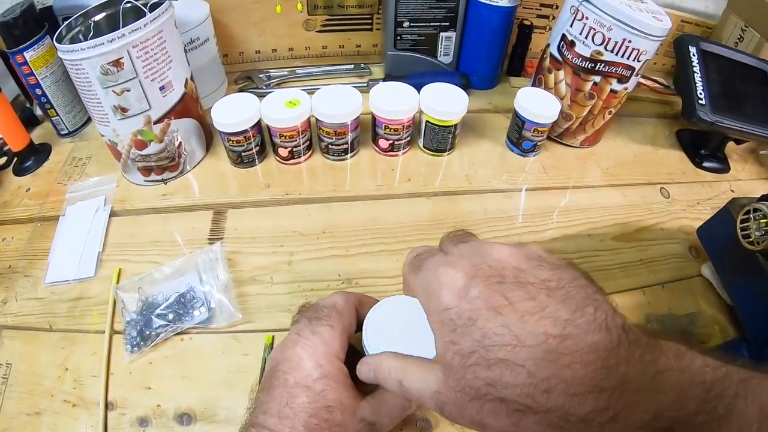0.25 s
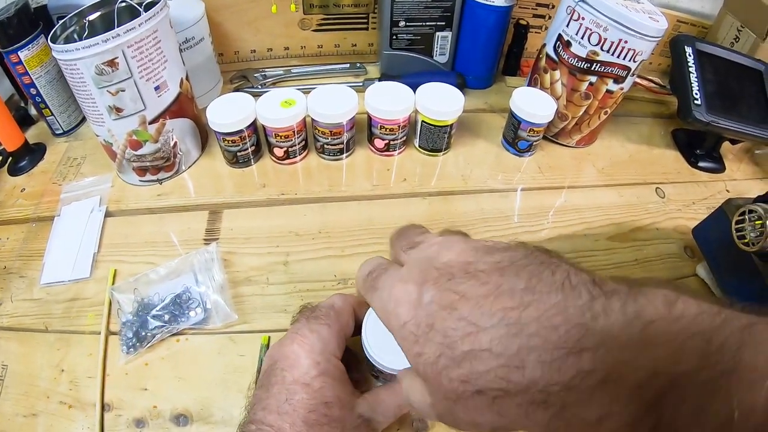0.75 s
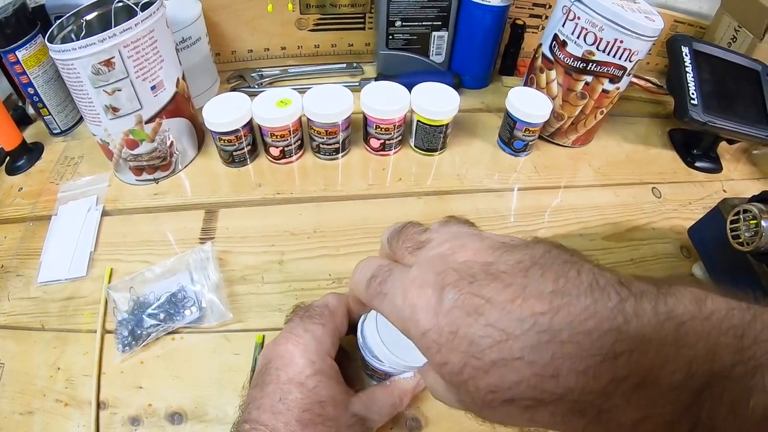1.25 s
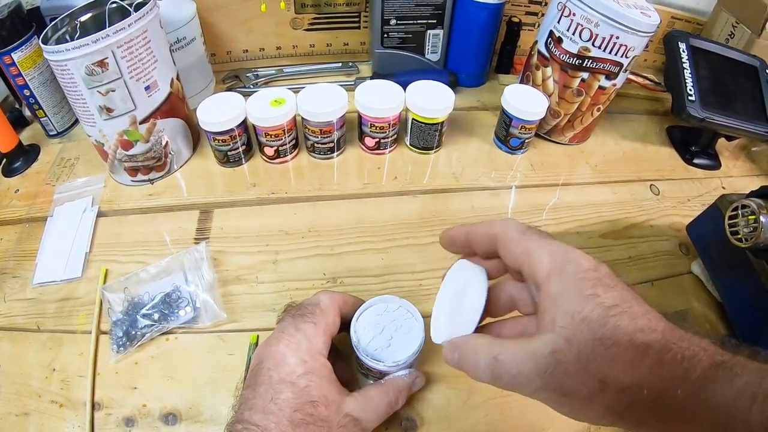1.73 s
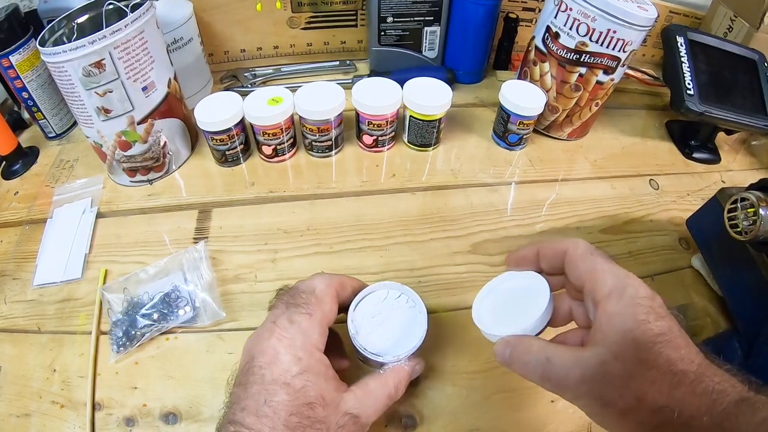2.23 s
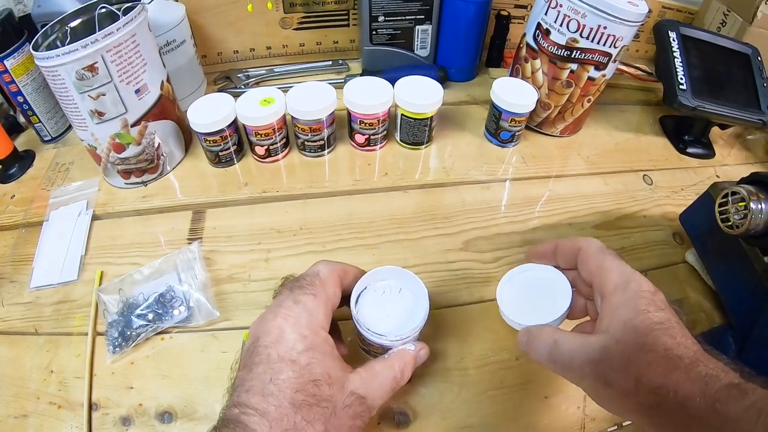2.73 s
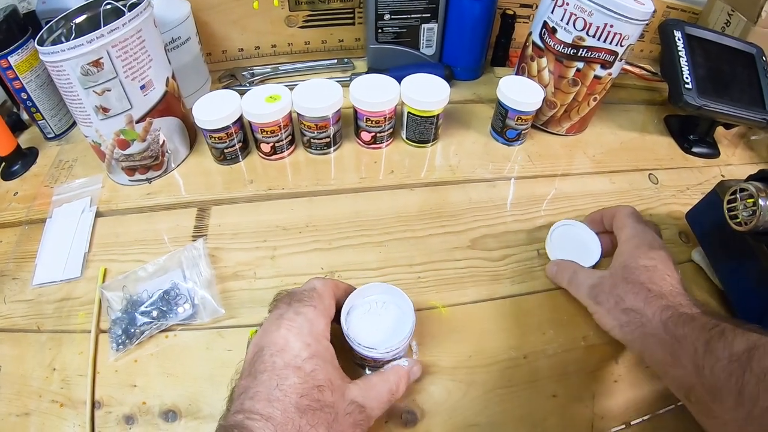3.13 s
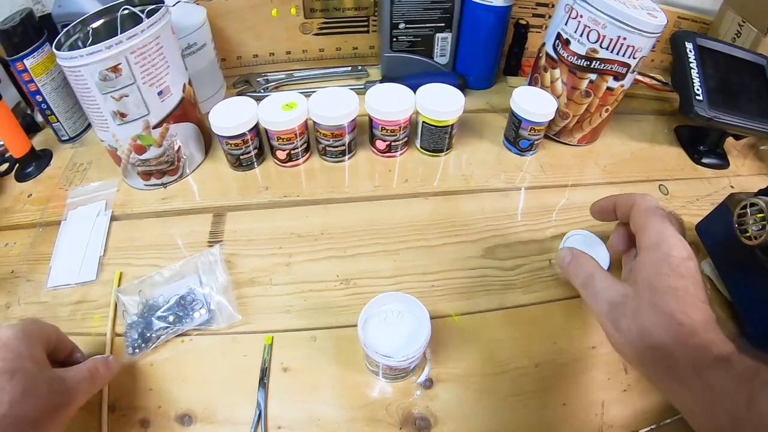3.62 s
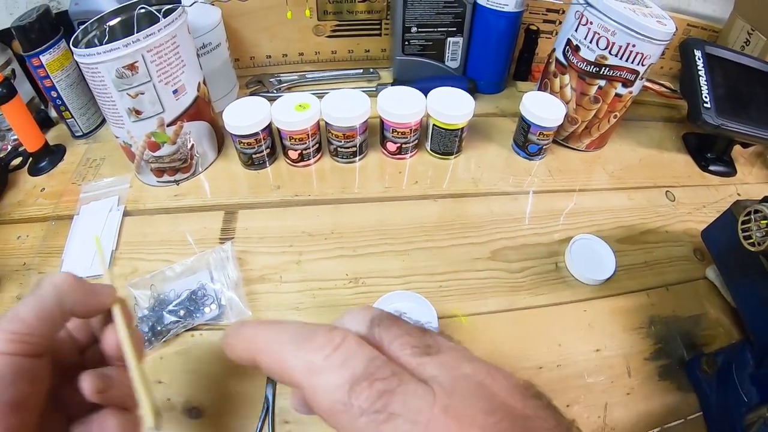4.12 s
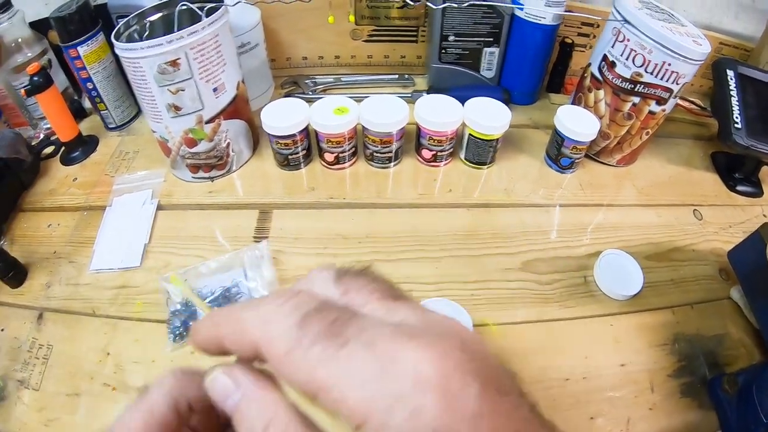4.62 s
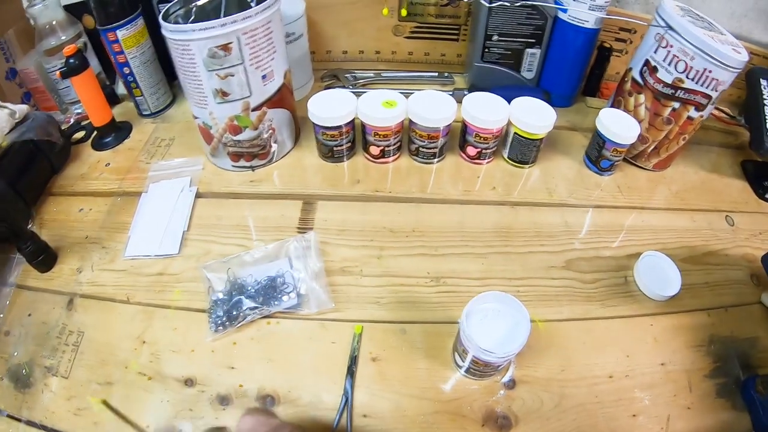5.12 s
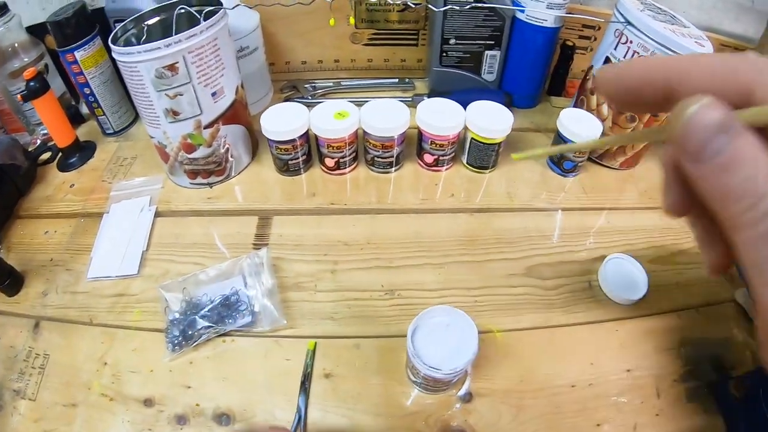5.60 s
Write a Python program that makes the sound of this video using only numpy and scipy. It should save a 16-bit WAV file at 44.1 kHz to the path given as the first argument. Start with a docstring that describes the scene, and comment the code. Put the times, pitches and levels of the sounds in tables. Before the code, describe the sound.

In a small workshop, a small plastic jar is unscrewed in four short grating twists, with bright clicks, a hard knock and tiny squeaks. Quiet handling follows, then lid and jar tap down on a wooden bench with dull thuds. Hands rub dryly before a thin wooden stick snaps twice, much louder than the rest. A body-worn camera microphone adds low rumble, faint hiss and puffs of air.

```python
"""A faint hiss, hum and rumble lie under a small plastic jar being unscrewed over a workbench.
In four turns its lid rasps (random slips shaking plastic), and it squeaks (wavering sine tones).
Hands rub (filtered grains); lid, jar and tools tap and knock (short bursts through resonances).
Two sharp cracks of a snapping wooden stick (torn noise and ringing tones) follow.
A short room echo surrounds these; a body-worn camera's one microphone also rumbles and catches puffs of air."""
import sys
import numpy as np
from scipy import signal
from scipy.fft import rfft, irfft, next_fast_len
from scipy.io import wavfile
from scipy.ndimage import uniform_filter1d, map_coordinates

SR = 44100
rng = np.random.default_rng(int(sys.argv[2]) if len(sys.argv) > 2 else 0)


def unload_audio(sound):
    """Save the sound as a 16-bit wav file, at the path given as the first command line argument."""
    columns = np.transpose(np.atleast_2d(sound))
    # keep every value between -1 and 1, then stretch to whole-number steps
    steps = np.round(np.clip(columns, -1, 1) * 32767)
    wavfile.write(sys.argv[1], SR, steps.astype(np.int16))


N = 258131
TIME = np.arange(N) / SR  # seconds through the whole scene
AGE = TIME[:SR // 3]  # seconds since the start of one short sound

# The stick breaks. Each row: time in seconds, crack level in dB, tearing time in seconds,
# ring level in dB relative to the tearing.
BREAKS = [(5.0326, -8, 0.0038, -4.5), (5.2121, -12, 0.0046, -5)]


def amp(db):
    """Turn decibels into a plain multiplier."""
    return 10 ** (np.asarray(db) / 20)


def unit(x):
    """Scale a sound to an average strength (rms) of 1."""
    return x / np.sqrt(np.mean(x ** 2) + 1e-20)


def crest(x, size=176):
    """Scale a short sound so that its loudest few milliseconds have rms 1."""
    power = uniform_filter1d(x * x, size, mode="constant")
    return x / np.sqrt(power.max() + 1e-20)


def fade(t, t60):
    """Die away exponentially, falling 60 dB in t60 seconds."""
    return np.exp(-np.log(1000) * t / np.maximum(t60, 1e-4))


def along(points, hz):
    """Read a curve of (Hz, value) points on a logarithmic frequency axis."""
    f, v = np.transpose(points)
    return np.interp(np.log(hz + 1), np.log(f + 1), v)


def wobble(rate):
    """Draw a smooth random curve through rate random points a second."""
    knots = rng.standard_normal(int(N * rate / SR) + 4)
    return map_coordinates(knots, [TIME * rate / SR])


def filtered(x, response):
    """Multiply the spectrum of x by a response that depends on frequency."""
    m = 2 * next_fast_len(len(x) // 2 + 4096)  # padding leaves room for ringing
    spectrum = rfft(x, m) * response(np.fft.rfftfreq(m, 1 / SR))
    return irfft(spectrum, m)[:len(x)]


def coloured(x, points):
    """Give x the tone of a (Hz, dB) curve, with no sound ahead of its cause."""
    def response(hz):
        # folding the cepstrum makes the filter respond only after its input
        cepstrum = irfft(np.log(amp(along(points, hz)) + 1e-6))
        half = len(cepstrum) // 2
        folded = np.r_[cepstrum[0], 2 * cepstrum[1:half], np.zeros(half)]
        return np.exp(rfft(folded))
    return filtered(x, response)


def resonate(x, modes):
    """Let x excite resonances, each given by its Hz, width in Hz and dB."""
    def response(f):
        return sum(amp(db) * 1j * f * w / (c * c - f * f + 1j * f * w) for c, w, db in modes)
    return filtered(x, response)


def grains(rate, spread_db):
    """Tiny slips at random moments, rate a second on average, of random sizes; rms 1."""
    happens = rng.random(N) < rate / SR
    direction = rng.choice([-1, 1], N)
    size = amp(spread_db * rng.standard_normal(N))
    return unit(happens * direction * size)


def contact(t60, chatter):
    """Force of a blow: one push, then a dying chatter."""
    force = rng.standard_normal(len(AGE)) * fade(AGE, t60)
    push = AGE == 0
    return chatter * force / np.linalg.norm(force) + push


def add(track, s, sound):
    """Mix a short sound into a track, starting at s seconds."""
    start = max(round(s * SR), 0)
    track[start:start + len(sound)] += sound[:N - start]


def stroke(s, length, db):
    """Gain over time of a hand movement: it speeds up and slows down again."""
    progress = np.clip((TIME - s) / length, 0, 1)
    return amp(db) * np.abs(np.sin(np.pi * progress)) ** 0.39  # the low power broadens the middle


def strokes(rows):
    """Gain over time of several movements."""
    return sum(stroke(*row) for row in rows)


def background():
    """Filtered noise makes a steady hiss and a rough hum; a wavering low tone holds, then fades."""
    # Tone of the workshop hiss. Each row: frequency in Hz, level in dB.
    air_tone = [(41, -42.5), (70, -4), (118, -11.5), (300, -19), (328, -19), (403, -24.5), (606, -23),
                (834, -28), (1150, -27.5), (1280, -30), (1510, -27.5), (3740, -35.5), (8860, -34.5),
                (16000, -42)]
    # Rough room hum. Each row: frequency in Hz, width in Hz, level in dB.
    hum_modes = [(119.5, 5, 0)]
    air_db, hum_db, drone_db = -59, -58.5, -47.5
    drone_hz, drone_hold_s, drone_t60_s = 63.55, 0.37, 0.95
    narrow = resonate(rng.standard_normal(N), hum_modes)
    hum = amp(hum_db) * unit(resonate(narrow, [(118, 50, 0)]))
    dying = fade(np.maximum(TIME - drone_hold_s, 0), drone_t60_s)
    phase = 2 * np.pi * drone_hz * TIME + 2.4 * wobble(10)
    drone = amp(drone_db) * dying * np.sqrt(2) * np.sin(phase)
    air = amp(air_db) * unit(coloured(rng.standard_normal(N), air_tone))
    return hum + drone + air


def handling():
    """The camera sways with a deep, lumpy rumble; each jerk is a push and a pull of air."""
    # Tone of the rumble. Each row: frequency in Hz, level in dB.
    rumble_tone = [(8, 8.5), (18, -3), (28, -4), (40, -5), (55, -26.5), (85, -38), (110, -37), (160, -52)]
    # Extra sway as the hands work. Each row: start in seconds, length in seconds, level in dB.
    lurches = [(-0.2, 1.45, -44.5), (2.55, 1.1, -51.5), (5.01, 0.42, -32.5), (5.3, 0.53, -46)]
    # Jerks of the hands push air at the microphone. Each row: middle in seconds, peak level in dB,
    # half length in seconds.
    jerks = [(5.061, -17.5, 0.017), (5.239, -13.5, .018), (5.354, -20.5, 0.0205)]
    steady_db = -43.5
    sway = (amp(steady_db) + strokes(lurches)) * amp(1.23 * wobble(7))
    rumble = sway * unit(coloured(rng.standard_normal(N), rumble_tone))
    pushes = np.zeros(N)
    for middle, level, half in jerks:
        position = (TIME - middle) / half
        pushes += amp(level) * -position * np.exp((1 - position ** 2) / 2)
    return rumble + pushes


def rubbing():
    """Skin slides with a fine dry grain, brighter under a light touch; sleeves have a duller one."""
    # Strokes of skin over plastic and wood. Each row: start in seconds, length in seconds,
    # level in dB before the cut and wobble below, lightness of touch from 0 to 1.
    rubs = [(-0.04, 0.17, -55.5, 0.6), (0.147, 0.029, -48, 0.4), (0.206, 0.036, -51, 0.6),
            (1.598, 0.32, -65.5, 0.6), (1.96, 0.047, -60.5, 0.7), (2.126, 0.042, -53, 0),
            (2.836, 0.056, -54, 0.8), (3.128, 0.048, -49.5, 0), (3.237, 0.028, -51.5, 0),
            (3.829, 0.15, -55, 0.05), (3.963, 0.024, -44, 0), (4.352, 0.26, -52.5, 0.22),
            (4.5, 0.053, -46, 0.97), (4.527, 0.98, -57, 0.18), (5.248, 0.21, -50, 0.02),
            (5.575, 0.17, -50, 0.38), (5.82, 0.08, -53.5, 0.2)]
    # Tone of a firm touch. Each row: frequency in Hz, level in dB.
    skin_tone = [(300, -2), (1300, -10), (2400, -3.5), (4000, -3), (7500, 0.5), (10500, -1), (13500, -17.5),
                 (16000, -17)]
    # Tone of a light touch, mostly treble. Each row: frequency in Hz, level in dB.
    brush_tone = [(2000, -23), (5000, -9.5), (9500, -2), (13500, -2.5), (16000, -9.5)]
    # Dull rustle as the arms move. Each row: start in seconds, length in seconds, level in dB.
    sleeve_moves = [(3.95, 0.7, -63), (4.84, 0.24, -66)]
    # Tone of the sleeves. Each row: frequency in Hz, level in dB.
    cloth_tone = [(120, -36), (280, 7), (600, -2.5), (1200, -21.5), (2200, -8.5), (5000, -25)]
    firm = unit(coloured(grains(rate=10000, spread_db=5.5), skin_tone))
    light = unit(coloured(grains(rate=14000, spread_db=9), brush_tone))
    skin = np.zeros(N)
    for s, length, db, lightness in rubs:
        share = np.clip(lightness, 0, 1)
        touch = np.sqrt(1 - share) * firm + np.sqrt(share) * light
        skin += stroke(s, length, db) * touch
    cloth = unit(coloured(grains(rate=2100, spread_db=6), cloth_tone))
    return skin * amp(-4.0 + 0.8 * wobble(45)) + strokes(sleeve_moves) * cloth


def clicks(tick_gain_db=-15, shell_gain_db=-1):
    """Each light contact chatters, giving a bright tick and a short hollow ring."""
    # Contacts of lid, jar and tools. Each row: time in seconds, tick level and shell level in dB,
    # both before the gains above.
    contacts = [(0.1255, -38, -48), (0.1496, -47, -46), (0.2122, -44, -63), (0.2995, -29, -44),
                (0.308, -26.5, -62), (0.3272, -25.5, -67), (0.3394, -24.5, -58), (0.379, -35, -49),
                (0.7466, -37, -38.5), (1.0084, -32, -55), (1.033, -43, -52), (1.0917, -26, -42),
                (1.2182, -41, -49.5), (1.5954, -38.5, -54), (1.7538, -43, -57), (1.8434, -41, -55.5),
                (2.216, -44, -51), (2.2517, -43, -62), (3.1325, -27, -43.5), (3.178, -33, -50.5),
                (3.5519, -27.5, -36.5), (3.5628, -17, -33.5), (3.6964, -38, -52), (3.8447, -33.5, -74),
                (3.906, -67, -38), (3.915, -60, -42), (3.9848, -27.5, -36.5), (4.1565, -46, -53),
                (4.512, -36, -54.5), (5.2944, -50, -42.5), (5.451, -50, -48.5)]
    # Tone of the tick. Each row: frequency in Hz, level in dB.
    tick_tone = [(1500, -25), (2800, 11), (4500, 7.5), (7500, 7), (11000, 5), (16000, -24)]
    # Resonances of hollow plastic. Each row: frequency in Hz, width in Hz, level in dB.
    shell_modes = [(755, 1900, -0.5), (1280, 250, -8.5), (1540, 400, -2.5), (1960, 130, -6)]
    chatter_t60_s = 0.024
    out = np.zeros(N)
    for s, tick_db, shell_db in contacts:
        force = contact(chatter_t60_s, chatter=2.9)
        tick = amp(tick_db + tick_gain_db) * crest(coloured(force, tick_tone))
        shell = amp(shell_db + shell_gain_db) * crest(resonate(force, shell_modes))
        add(out, s, tick + shell)
    return out


def squeaks():
    """A finger or the rim sticks and slips in a brief unsteady tone; every slip also rasps the rim."""
    # Each row: time of the crest in seconds, middle pitch in Hz, tone level in dB,
    # half length in seconds, rasp level in dB relative to the tone.
    slips = [(.152, 1420, -49, .0015, -6), (.160, 1357, -40, .0035, -12), (1.110, 1124, -36, .0015, -16),
             (2.396, 1250, -43, .0015, -5), (2.404, 1220, -33.5, .003, -14)]
    # Resonances of the rim. Each row: frequency in Hz, width in Hz, level in dB.
    rim_modes = [(1720, 120, -4), (2950, 130, -2), (3340, 120, 0), (3730, 110, -1), (4850, 130, -13),
                 (5980, 140, -3)]
    lead_s = 0.05  # time allowed for a squeak to swell before its crest
    out = np.zeros(N)
    drift = 1 + .012 * wobble(250)[:len(AGE)]
    for s, hz, db, half, rasp_db in slips:
        swell = np.exp(-(np.abs(AGE - lead_s) / half) ** 1.3 / 2)
        tone = swell * np.sin(2 * np.pi * hz * np.cumsum(drift) / SR)
        # noise gets through only on the upper half of each cycle
        scrape = np.maximum(tone, 0) * rng.standard_normal(len(AGE))
        rasp = resonate(scrape, rim_modes)
        add(out, s - lead_s, amp(db) * (crest(tone) + amp(rasp_db) * crest(rasp)))
    return out


def envelope(s, attack, hold, t60):
    """Gain over time: a straight rise, a hold and an exponential release."""
    rise = np.clip((TIME - s) / attack, 0, 1)
    return rise * fade(np.maximum(TIME - s - attack - hold, 0), t60)


def twists():
    """Gains of the parts: plastic shudders most as a twist starts and stops, thread hisses with speed."""
    # Twists of the lid, with levels before later changes. Each row: start, attack, hold and
    # release (time to fall 60 dB) in seconds, jar level in dB, lid level in dB, lid's growth
    # over the hold in dB, thread hiss level in dB, fastest moment in seconds, extra hiss there in dB.
    turns = [(0.294, 0.0069, 0.022, 0.38, -51, -55.5, 2.5, -52, 0.4, 7.5),
             (0.465, 0.019, 0.13, 0.12, -47, -41, -4, -44, 0.59, 2.5),
             (0.797, 0.032, 0.014, 0.08, -35.5, -38.5, 1.5, -38, 0.867, 9.5),
             (1.000, 0.008, 0.114, 0.14, -40.5, -41.5, 4.5, -51, 1.064, 12)]
    # the shudder eases by this much in mid-twist
    jar_ease_db, lid_ease_db = 7.5, 6.5
    spurt_s = 0.018  # half length of the fastest part
    jar, lid, thread = np.zeros((3, N))
    for s, attack, hold, t60, jar_db, lid_db, growth_db, hiss_db, fastest, spurt_db in turns:
        effort = envelope(s, attack, hold, t60)
        progress = np.clip((TIME - s - attack) / hold, 0, 1)
        glide = np.sin(np.pi * progress) ** 2
        spurt = np.exp(-((TIME - fastest) / spurt_s) ** 2 / 2)
        jar += effort * amp(jar_db - jar_ease_db * glide)
        lid += effort * amp(lid_db + growth_db * progress - lid_ease_db * glide)
        thread += effort * amp(hiss_db + spurt_db * spurt)
    return jar, lid, thread


def unscrewing():
    """Coarse slips shake jar and lid while the thread hisses, all in uneven jolts."""
    # Tones of jar, lid and thread. Each row: frequency in Hz, level in dB.
    jar_tone = [(110, -19), (210, -1.5), (300, -3), (480, 2.5), (720, -3), (1000, -29), (1600, -25.5)]
    lid_tone = [(500, -24.5), (850, 6.5), (1100, 7), (1400, 8), (1750, 9), (2050, -24.5), (2600, -7),
                (4000, -48)]
    thread_tone = [(1180, -23), (2000, -2.5), (2200, -9), (2530, -3.5), (4050, -11), (5210, -5.5),
                   (6250, -8), (7510, -4.5), (9090, -5), (13100, -9.5), (16000, -22)]
    jar_gain, lid_gain, thread_gain = twists()
    jolts = amp(1.55 * wobble(130))
    slips = grains(rate=900, spread_db=3.5)
    fine_slips = grains(rate=5300, spread_db=1.5) + .5 * slips
    jar = jar_gain * unit(coloured(slips, jar_tone))
    lid = lid_gain * unit(coloured(slips, lid_tone))
    hiss = thread_gain * unit(coloured(fine_slips, thread_tone))
    return jolts * (amp(-2.0) * jar + amp(-2.0) * lid + amp(-0.5) * hiss)


def knocks():
    """Blows make the boards thud; a softer contact (lower corner) keeps mainly their low modes."""
    # Blows that reach the bench. Each row: time in seconds, level in dB,
    # contact corner in Hz, time for the chatter to fall 60 dB in seconds.
    blows = [(0.301, -40, 340, 0.1), (0.325, -38.5, 199, 0.24), (.746, -29, 1110, 0.01),
             (0.758, -37, 700, 0.13), (1.005, -43.5, 600, 0.15), (1.261, -50, 493, 0.022),
             (1.843, -53.5, 300, 0.052), (2.219, -51.5, 1520, 0.019), (2.697, -50, 300, 0.067),
             (3.133, -44, 393, 0.15), (3.1418, -33, 155, 0.058), (3.1522, -37, 193, 0.084),
             (3.228, -44, 250, 0.07), (3.259, -34.5, 140, 0.091), (3.562, -33.5, 800, 0.16),
             (3.575, -40.5, 804, 0.14), (3.846, -46.5, 800, 0.049), (3.857, -44, 450, 0.099),
             (3.913, -39.5, 220, 0.08), (3.985, -41.5, 714, 0.08)]
    # Each snap also jolts the bench. In order: level in dB, contact corner in Hz,
    # time for the chatter to fall 60 dB in seconds.
    jolt = (-28, 300, 0.093)
    # Modes of the boards. Each row: frequency in Hz, width in Hz, level in dB.
    bench_modes = [(112, 22, -5), (210, 30, 4), (305, 65, -2), (480, 110, -5), (660, 140, -5),
                   (1000, 300, -9)]
    out = np.zeros(N)
    snap_jolts = [(snap[0], *jolt) for snap in BREAKS]
    for s, db, corner_hz, t60 in list(blows) + snap_jolts:
        blow = contact(t60, chatter=.48)
        force = filtered(blow, lambda hz: 1 / (1 + .5j * hz / corner_hz) ** 4)
        add(out, s, amp(db) * crest(resonate(force, bench_modes)))
    return out


def snaps():
    """Fibres tear for a few milliseconds; the sudden release leaves the wood ringing briefly."""
    # Tone of the tearing. Each row: frequency in Hz, level in dB.
    crack_tone = [(300, -39.5), (700, -8.5), (1200, -11), (1850, -6), (2300, -8.5), (3500, -7),
                  (4700, -1.5), (6300, -1), (8000, 0.5), (9800, -2), (12500, -7.5), (13600, -14.5),
                  (16000, -15)]
    # Modes of the stick. Each row: frequency in Hz, width in Hz, level in dB before a random lift.
    stick_modes = [(455, 25, -4), (867, 34, -5), (1790, 36, -1), (1911, 28, 0), (2640, 45, -7),
                   (3430, 50, -5), (4390, 60, -5), (4750, 90, -4), (5600, 60, -3), (6005, 45, 1),
                   (6400, 70, -2), (7062, 50, 0), (7400, 65, 2), (7550, 70, 3), (7886, 60, 5),
                   (9230, 55, -1), (9470, 45, -1), (10210, 45, -1), (11900, 65, -4)]
    out = np.zeros(N)
    for s, db, tearing, ring_db in BREAKS:
        tear = rng.standard_normal(len(AGE)) * np.exp(-(AGE / tearing) ** 2.4)
        chance = rng.random((len(stick_modes), 2))
        ring = np.zeros(len(AGE))
        for (hz, width, level), (loud, phase) in zip(stick_modes, chance):
            decay = width * np.exp(-np.pi * width * AGE)  # wider modes start stronger and die sooner
            ring += amp(level + 2 * loud) * decay * np.sin(2 * np.pi * (hz * AGE + phase))
        crack = crest(coloured(tear, crack_tone)) + amp(ring_db) * crest(ring)
        add(out, s, amp(db) * crest(crack))
    return out


def workshop(x, wet_db, delay):
    """Bench and close walls answer with a short dense tail that builds up around delay seconds."""
    # How long the room rings. Each row: frequency in Hz, time to fall 60 dB in seconds.
    room_t60 = [(150, 0.3), (1000, 0.18), (3000, 0.18), (8000, 0.14), (15000, 0.16)]
    hz, t, z = signal.stft(rng.standard_normal(len(AGE)), SR, nperseg=256)
    decay = fade(t, along(room_t60, hz)[:, None])
    tail = signal.istft(z * decay, SR, nperseg=256)[1][:len(AGE)]
    tail = tail * (1 - np.exp(-(AGE / delay) ** 4))
    echo = signal.fftconvolve(x, tail / np.linalg.norm(tail))[:N]
    return x + amp(wet_db) * echo


def scene():
    """Jar, taps and stick sound in one small room; rumble and background join at the microphone."""
    # Faint lingering ring from things on the bench. Each row: frequency in Hz, width in Hz, level in dB.
    tin_modes = [(1205, 1.5, 0), (2160, 3, 0)]
    jar = workshop(unscrewing() + rubbing(), wet_db=-11.5, delay=0.0045)
    jar = jar + workshop(squeaks(), wet_db=-16.5, delay=0.012)
    taps = workshop(clicks(), wet_db=-8.0, delay=0.0063)
    taps = taps + workshop(knocks(), wet_db=-11.5, delay=0.0039)
    stick = workshop(snaps(), wet_db=-6, delay=0.0062)
    lingering = amp(-10.5) * resonate(jar + taps, tin_modes)
    mix = jar + taps + stick + lingering + handling() + background()
    return np.tile(mix, (2, 1))  # the same sound on both sides


def record(dry):
    """The camera rounds off the highest peaks and cuts steeply above its band limit."""
    top_hz = 16100
    limited = dry / (1 + np.abs(dry) ** 8) ** (1 / 8)

    def band_limit(hz):
        return 1 / np.sqrt(1 + (hz / top_hz) ** 160)
    return np.array([filtered(channel, band_limit) for channel in limited])


dry = scene()
out = record(dry)
unload_audio(out)
```